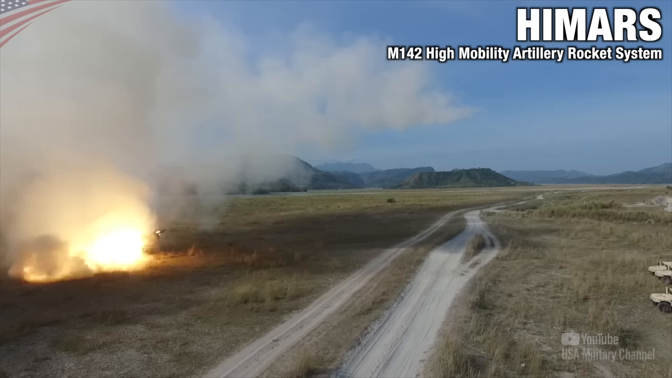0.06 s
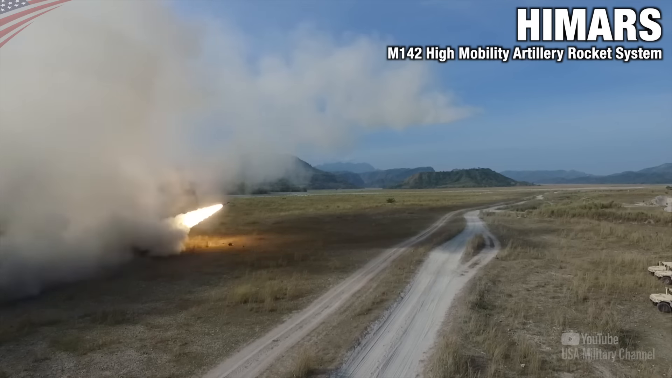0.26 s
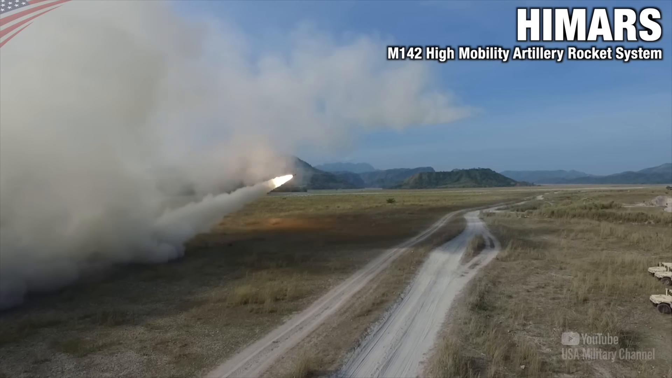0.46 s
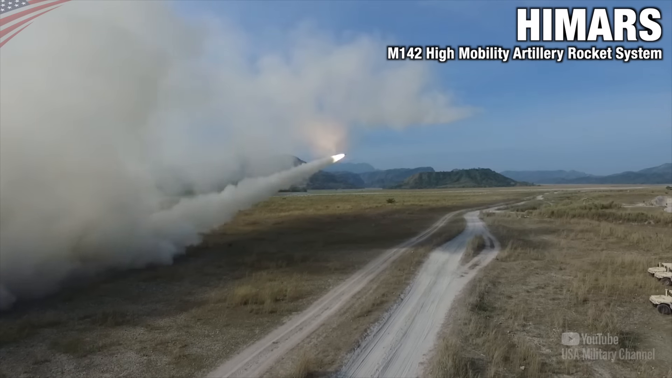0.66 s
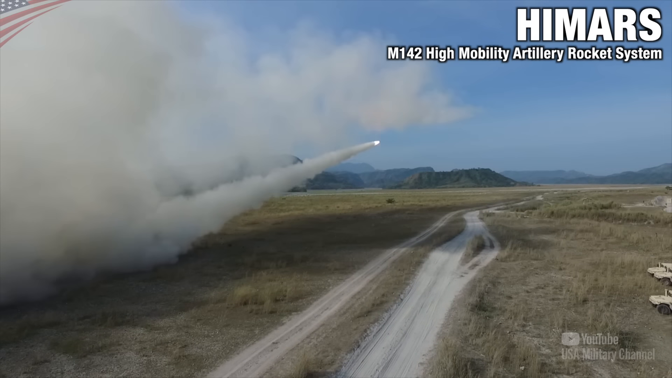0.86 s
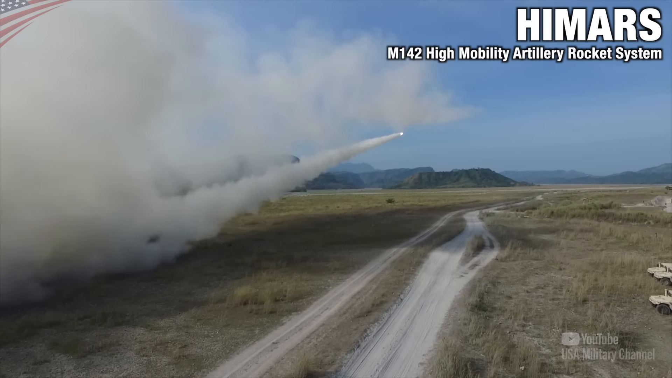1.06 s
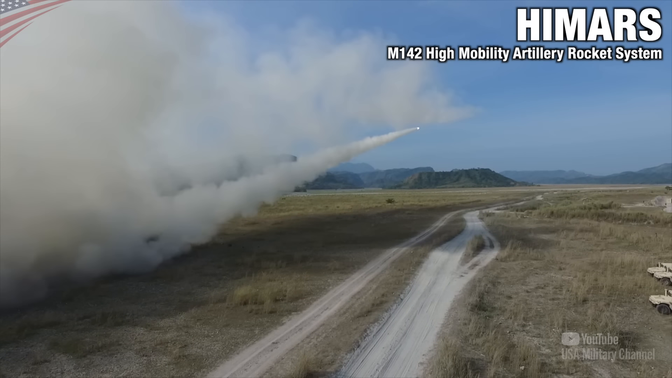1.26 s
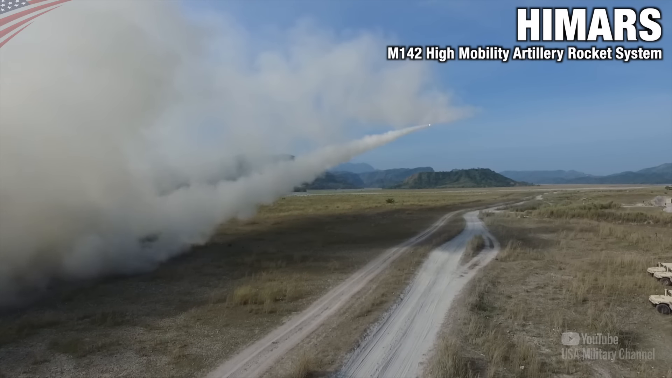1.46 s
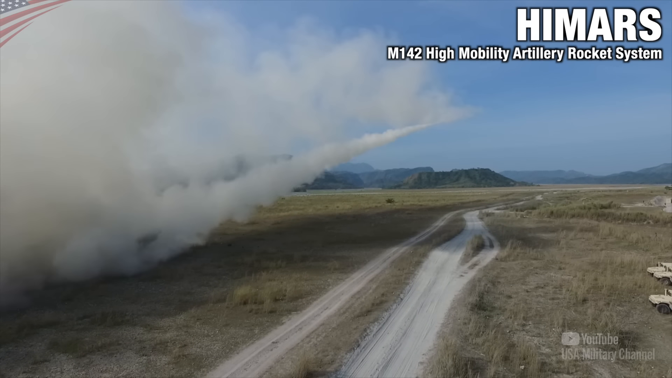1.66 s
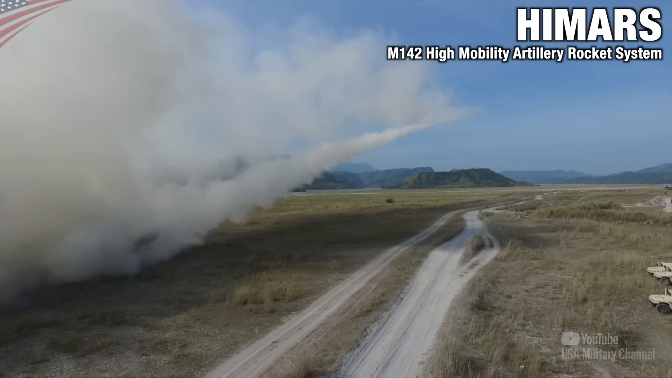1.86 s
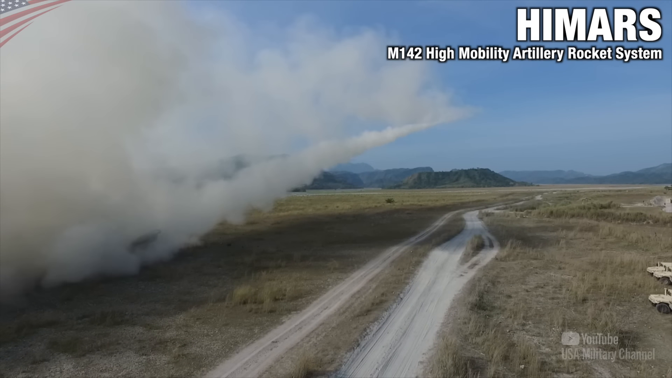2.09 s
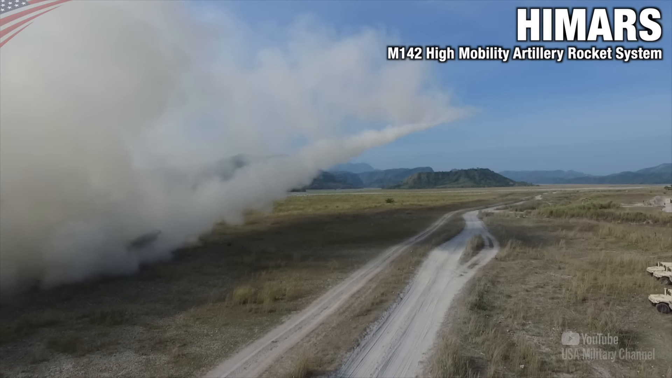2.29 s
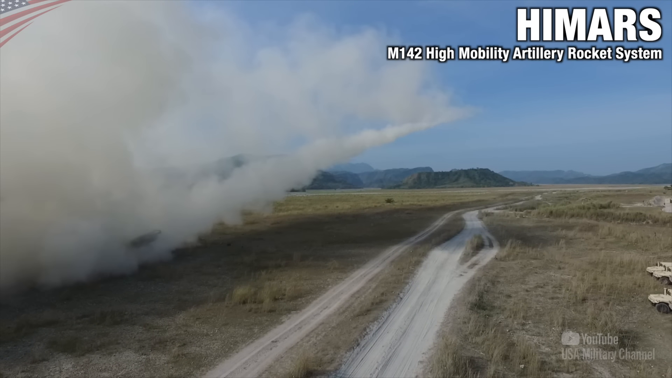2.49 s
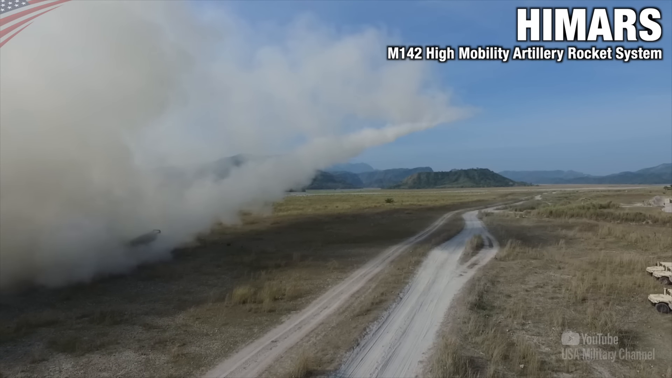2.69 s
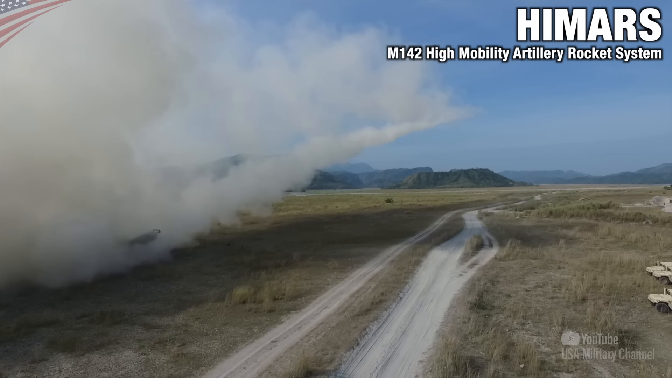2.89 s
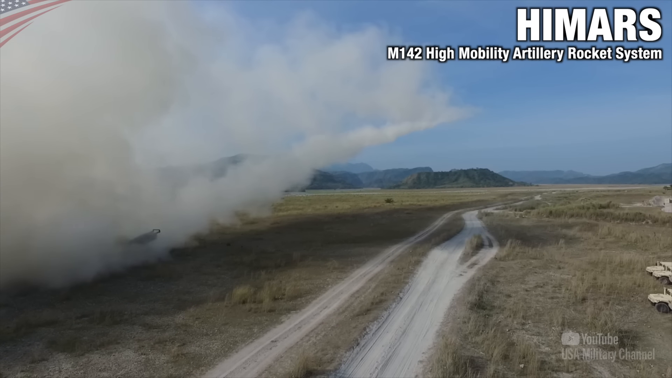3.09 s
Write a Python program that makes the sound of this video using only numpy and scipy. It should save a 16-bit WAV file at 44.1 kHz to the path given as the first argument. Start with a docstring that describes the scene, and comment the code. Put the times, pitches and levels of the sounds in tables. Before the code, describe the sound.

A rocket fires close by with an overloaded blast and crackling roar, leaving low rolling echoes.

```python
"""An open range: a rocket leaves its launcher close to a small microphone.
The ignition blast, low noise with a sinking boom, gives way to the jet's roar, shaped noise that sinks in pitch.
Random shock pulses crackle over it, and filtered noise makes the rumble that rolls back from the land.
For over a second the microphone is driven hard into clipping, and single sharp ticks of overload stand out."""
import sys
import numpy as np
from scipy import signal
from scipy.fft import rfft, irfft
from scipy.io import wavfile
from scipy.ndimage import uniform_filter1d

SR = 44100
rng = np.random.default_rng(int(sys.argv[2]) if len(sys.argv) > 2 else 0)


def materialize(psi):
    """Save the field psi as 16-bit PCM at rate SR to the path in sys.argv[1].

    A 1-D psi becomes a single channel; in a 2-D psi each row is a channel.
    """
    bounded = np.clip(np.atleast_2d(psi).T, -1, 1)
    quanta = np.round(bounded * 32767).astype(np.int16)
    wavfile.write(sys.argv[1], SR, quanta)


N = 136710
T = np.arange(N) / SR  # time [s]

FIRE_S, BLAST_HOLD_S = 0.2226, 0.14  # ignition, and how long the rocket stays in the tube
NEAR_UNTIL_S = 0.85  # from here on the rocket is far enough to act as a point

# The jet as it draws away: (time [s], level [dB], peak of the roar [Hz], lag of the ground bounce [ms])
FLIGHT = [(.22, -11.5, 1970, .5), (.39, 3.5, 1430, 0.98), (.5, 5, 1090, 0.74), (.62, 10, 726, 1.29),
          (.78, 7.5, 530, 2.1), (1.0, 5, 415, 2.54), (1.22, 1.5, 405, 2.17), (1.45, -11.5, 430, 2.16),
          (1.75, -14, 448, 2.23), (1.95, -17.5, 513, 2.26), (2.05, -19, 464, 2.23),
          (2.14, -18.5, 490, 2.51), (2.4, -32, 480, 2.06), (3.1, -51.5, 520, 2.5)]


def amp(db):
    """Decibels to gain."""
    return 10 ** (np.asarray(db) / 20)


def unit(x):
    """Scales to rms 1."""
    return x / np.sqrt(np.mean(x ** 2) + 1e-20)


def at_hz(points, hz):
    """Reads a spectrum in dB on a log-frequency axis."""
    f, db = np.transpose(points)
    return np.interp(np.log(hz + 1e-6), np.log(f), db)


def at_s(points, t, axis=1):
    """Reads one column of a time curve."""
    rows = np.array(points)
    return np.interp(t, rows[:, 0], rows[:, axis])


def grid(size):
    """Frame times (a column) and bin frequencies of short-time spectra."""
    hop = size // 4
    frames = np.arange(N * 4 // size + 5)[:, None]
    return frames * hop / SR, np.fft.rfftfreq(size, 1 / SR)


def noise(field_db, size):
    """Noise of rms 1 whose spectrum follows a dB field; every frame gets the same power."""
    t, _ = grid(size)
    gain = amp(field_db) * np.ones_like(t)
    gain = gain / np.sqrt((gain ** 2).mean(1, keepdims=True))
    z = rng.standard_normal(gain.shape) + 1j * rng.standard_normal(gain.shape)
    _, x = signal.istft((z * gain).T, nperseg=size, noverlap=size - size // 4)
    return unit(x[:N])


def waver(rate_hz, depth_db):
    """A gain that wanders at random, mostly at rates around and below the given one, by an rms depth."""
    ratio = np.fft.rfftfreq(N, 1 / SR) / rate_hz
    wander = irfft(rfft(rng.standard_normal(N)) * ratio * np.exp(-ratio ** 2), N)
    return amp(depth_db * unit(wander))


def colour(x, points, size=4096):
    """Causal minimum-phase filter with the given spectrum."""
    log_gain = np.log(amp(at_hz(points, abs(np.fft.fftfreq(size, 1 / SR)))))
    taps = np.fft.ifft(np.exp(np.conj(signal.hilbert(log_gain)))).real
    return signal.oaconvolve(x, taps[:size // 2])[:N]


def peak_db(hz, centre_hz, width_hz):
    """Spectrum of one steep-sided resonance, 6 dB down one width away from the centre."""
    return -20 * np.log10(1 + ((hz - centre_hz) / width_hz) ** 2)


def steadied(x, share):
    """Evens out part of the chance swells of a noise."""
    power = uniform_filter1d(abs(signal.hilbert(x)) ** 2, size=1800)
    return unit(x / (abs(power) + 1e-6) ** (share / 2))


def patches(shape, size, count):
    """Random blotches of rms 1, size frames long and count bins wide."""
    longer = uniform_filter1d(rng.standard_normal(shape), size, 0)
    return unit(uniform_filter1d(longer, count, 1))


def nearness(t):
    """1 as the rocket leaves the tube, 0 once it is far enough to act as a point."""
    return np.clip((NEAR_UNTIL_S - t) / (NEAR_UNTIL_S - FIRE_S - BLAST_HOLD_S), 0, 1)


def open_air():
    """Quiet air of the open range, a steady noise heard alone before the shot."""
    # Spectrum: (frequency [Hz], relative density [dB])
    air_spectrum = [(20, -9.5), (80, 0.5), (217, 0.5), (300, -7.5), (390, 0.5), (555, -9), (1900, -13.5),
                    (4000, -23.5), (8000, -33.5), (15000, -47.5)]
    _, hz = grid(size=2048)
    return amp(-55.5) * noise(at_hz(air_spectrum, hz), size=2048)


def blast():
    """Gas bursts from the tube, holds with the rocket inside, then drops; its boom sinks as the tube empties."""
    # Spectrum of the gas in the tube: (frequency [Hz], relative density [dB])
    gas_spectrum = [(20, -10), (90, -6), (200, -2.5), (320, -3), (600, -3), (1500, -14.5), (5000, -20.5),
                    (15000, -48.5)]
    gas_db, fall_db_per_s = 6, 286
    boom_db, boom_from_hz, boom_to_hz, boom_width_hz = 1.5, 240, 185, 75
    t, hz = grid(size=2048)
    end_s = FIRE_S + BLAST_HOLD_S
    boom_hz = np.interp(t, [FIRE_S, end_s], [boom_from_hz, boom_to_hz])
    boom = amp(boom_db) * noise(peak_db(hz, boom_hz, boom_width_hz), size=2048)
    boom *= waver(rate_hz=36, depth_db=2.0)
    gas = amp(gas_db) * noise(at_hz(gas_spectrum, hz), size=2048)
    return amp(-fall_db_per_s * np.maximum(T - end_s, 0)) * (boom + gas)


def jet():
    """Turbulent, lumpy roar whose broad peak slides down as the rocket climbs away."""
    # Spectrum around the peak: (multiple of the peak frequency [1], relative density [dB])
    jet_spectrum = [(.05, -22), (.3, -3.5), (.55, 0.5), (1, 1.5), (1.5, -1.5), (2, -8), (3, -14),
                    (8, -32.5), (16, -40.5), (36, -102)]
    near_width, patchy_db = 1.31, 1.5  # widening by the long plume close by [1], rms depth of blotches
    t, hz = grid(size=2048)
    width = 1 + (near_width - 1) * nearness(t)
    multiple = (hz / at_s(FLIGHT, t, axis=2)) ** (1 / width)
    field = at_hz(jet_spectrum, multiple)
    field = field + patchy_db * patches(field.shape, size=6, count=5)
    return amp(at_s(FLIGHT, T)) * noise(field, size=2048) * waver(rate_hz=85, depth_db=1.0)


def howl():
    """A narrow, sustained core of the roar glides down and settles."""
    # The core in flight: (time [s], level [dB], centre [Hz])
    core_curve = [(.37, -14, 1700), (.43, -2.5, 1400), (.53, 0, 1000), (.62, -5, 734), (.73, -2.5, 500),
                  (.84, 3.5, 460), (.95, 0.5, 440), (1.05, -7.5, 410), (1.2, -4, 383), (1.32, -21, 380),
                  (1.6, -37, 380), (3.1, -90, 380)]
    t, hz = grid(size=2048)
    centre_hz = at_s(core_curve, t, axis=2)
    core = noise(peak_db(hz, centre_hz, width_hz=0.2 * centre_hz), size=2048)
    return amp(at_s(core_curve, T)) * steadied(core, share=0.4)


def crackle():
    """Steep one-sided shocks of equal strength come in flurries; the air dulls them with distance."""
    # Shock waves of the jet: (time [s], level [dB])
    crackle_level = [(.22, 0.5), (.45, -2), (.75, -1.5), (1.1, -9), (1.27, -15), (1.32, -23.5), (1.39, -16),
                     (1.45, -23), (1.55, -27.5), (1.72, -26.5), (1.76, -22.5), (1.81, -25), (1.83, -34),
                     (1.91, -30), (1.955, -24), (2.01, -25.5), (2.035, -39), (2.08, -48), (2.11, -29),
                     (2.18, -35), (2.25, -33.5), (2.31, -33.5), (2.41, -48.5), (2.68, -44), (2.78, -52),
                     (3.1, -53)]
    # Colour of one shock: (frequency [Hz], relative density [dB])
    shock_spectrum = [(100, -8), (600, -5.5), (1800, -1), (2800, -6), (4500, -5), (7000, -21),
                      (15000, -25.5)]
    shocks_per_s = 1300
    air_db_per_s, air_from_s = 28, 1.76  # extra loss at 10 kHz as the range grows
    shocks = (rng.random(N) < shocks_per_s / SR).astype(float)
    shocks = unit(colour(shocks - shocks.mean(), shock_spectrum)) * waver(rate_hz=100, depth_db=2.0)
    hz, t, z = signal.stft(shocks, SR, nperseg=256)
    loss_db = air_db_per_s * np.maximum(t - air_from_s, 0) * (hz[:, None] / 10 ** 4) ** 2
    _, dulled = signal.istft(z * amp(-loss_db), SR, nperseg=256)
    return -amp(at_s(crackle_level, T)) * dulled[:N]


def scatter(x):
    """Rough ground adds a short, duller noise tail to each shock."""
    tail_gain, decay_s = amp(-3), 0.011
    tail = colour(rng.standard_normal(N), [(100, -1), (5000, -0.33), (15000, -3)]) * np.exp(-T / decay_s)
    tail /= np.linalg.norm(tail)
    scattered = signal.fftconvolve(x, tail)[:N]
    return (x + tail_gain * scattered) / np.hypot(1, tail_gain)


def ground(x):
    """A delayed, duller bounce off the ground combs the roar; its lag follows the flight."""
    far_share, treble_hz = 0.26, 2500  # strength once far off [1], and where the bounce loses its treble
    bounce = signal.sosfilt(signal.butter(1, treble_hz, fs=SR, output="sos"), x)
    lag_s = at_s(FLIGHT, T, axis=3) / 1000
    share = far_share * (1 - nearness(T))  # the long plume blurs the bounce close by
    return (x + share * np.interp(T - lag_s, T, bounce)) / np.hypot(1, share)


def rumble():
    """Large eddies in the exhaust plume swell after the rocket has cleared the launcher."""
    # Swells of the plume: (time [s], level [dB])
    rumble_level = [(.22, -10), (.45, -24), (.62, -35), (.76, -1), (.86, 2), (.96, -2.5), (1.03, 2),
                    (1.21, -7.5), (1.31, -8.5), (1.36, -7.5), (1.45, -13), (1.72, -17.5), (1.77, -16.5),
                    (1.86, -18), (2.0, -28), (2.15, -31.5), (2.4, -46), (3.1, -51.5)]
    # Spectrum of the eddies: (frequency [Hz], relative density [dB])
    rumble_spectrum = [(15, -26.5), (35, -7.5), (60, -13), (90, -1.5), (160, -5), (230, -12), (400, -47),
                       (1500, -50)]
    _, hz = grid(size=2048)
    return amp(at_s(rumble_level, T)) * noise(at_hz(rumble_spectrum, hz), size=2048)


def roll():
    """Echoes from the land, made as noise, build up, then fade and lose their treble."""
    # Roar rolling back, as it is 2.7 s in: (frequency [Hz], relative density [dB])
    roll_spectrum = [(20, -25), (60, -1.5), (100, -2), (155, 1.5), (205, -7.5), (310, -6), (420, -11.5),
                     (650, -13.5), (950, -23), (2100, -33), (2700, -36.5), (4200, -37.5), (7000, -58),
                     (10000, -76.5), (15000, -98)]
    start_db, rise_s, fade_db_per_s = -18, 0.87, 2.5
    dull_db_per_s = 0.5  # per doubling of 1 + frequency / 600 Hz, up to 2 kHz
    t, hz = grid(size=2048)
    age = np.maximum(T - FIRE_S, 0)
    dull_db = dull_db_per_s * (t - 2.7) * np.log2(1 + np.minimum(hz, 2000) / 600)
    echoes = steadied(noise(at_hz(roll_spectrum, hz) - dull_db, size=2048), share=0.22)
    return np.minimum(age / rise_s, 1) * amp(start_db - fade_db_per_s * age) * echoes


def wash():
    """Distant exhaust noise over the hills swells and ebbs in the upper middle."""
    # Swells of the wash: (time [s], level [dB])
    wash_level = [(1.2, -42.5), (1.85, -34.5), (2.06, -29.5), (2.25, -40), (2.42, -41.5), (2.58, -42.5),
                  (2.68, -38), (2.75, -49), (2.88, -44.5), (3.1, -66)]
    # Spectrum of the wash: (frequency [Hz], relative density [dB])
    wash_spectrum = [(100, -23.5), (560, -3), (850, -11.5), (1080, -6.5), (1400, 5), (2100, 2),
                     (2600, -19.5), (4300, -9), (8000, -53.5), (15000, -88.5)]
    _, hz = grid(size=1024)
    return amp(at_s(wash_level, T)) * noise(at_hz(wash_spectrum, hz), size=1024)


def overload_ticks():
    """Single sharp ticks of overload, each made as a steep front, then a swing back."""
    # Overload ticks: (time [s], level [dB])
    ticks = [(1.3383, 0), (1.5117, -7), (1.5318, -5), (1.6893, -7), (1.7039, -7), (1.7558, -4),
             (1.8022, -8), (1.8127, -8), (1.947, -9), (1.9603, -17), (1.965, -13), (1.9905, -17),
             (2.0816, -20), (2.1027, -17), (2.1144, -20), (2.1325, -20), (2.1356, -18)]
    swing_s = 0.00031  # length of the first swing
    out = np.zeros(N)
    for start_s, db in ticks:
        u = np.maximum(T - start_s, 0) / swing_s
        out -= (T >= start_s) * amp(db) * (1 - u) * np.exp(-u)
    return out


def thump():
    """One dull knock, a fast-fading noise puff, stands out of the rolling echoes."""
    # Spectrum of the knock: (frequency [Hz], relative density [dB])
    thump_spectrum = [(30, -31), (130, 9), (400, -5), (750, -4), (1200, -12), (4000, -41), (12000, -84)]
    start_s, start_db, fall_db_per_s = 2.701, -22.5, 299
    level = (T >= start_s) * amp(start_db - fall_db_per_s * abs(T - start_s))
    puff = rng.standard_normal(N)
    return colour(level * puff, thump_spectrum) / colour(puff, thump_spectrum).std()


def scene():
    """The launch over quiet open air, alike in both channels."""
    flight = ground(jet() + scatter(crackle())) + howl()
    land = roll() + wash() + thump()
    launch = (T >= FIRE_S) * (blast() + flight + overload_ticks() + rumble() + land)
    mono = launch + open_air()
    return np.array([mono, mono])


def record(dry):
    """The input saturates into flat-topped waves; then the recorder's colour and the band limit."""
    # Resonances of the microphone port, ahead of the overload: (frequency [Hz], gain [dB])
    port_response = [(400, -1), (530, -0.5), (650, -0.5), (820, 0.5), (1060, -0.5), (1300, -1.5),
                     (1900, 0.5), (2800, 2), (4300, 0.5), (6000, 5), (15000, -5.5)]
    # Colour of the recorder after the overload: (frequency [Hz], gain [dB])
    recorder_response = [(20, -5.5), (150, -0.5), (600, -1.5), (2000, -1), (5000, -2.5), (9000, -1.5),
                         (15000, -4)]
    limit = amp(-9.5)
    bias = 0.1  # share of the limit by which negative swings clip sooner and positive ones later
    edge_hz = 15100
    drive = colour(dry[0], port_response) / limit
    clipped = limit * np.clip(drive, bias - 1, bias + 1)
    band = signal.firwin(511, edge_hz, window=("kaiser", 9), fs=SR)
    out = signal.oaconvolve(colour(clipped, recorder_response), band, "same")
    return np.array([out, out])


dry = scene()
out = record(dry)
materialize(out)
```